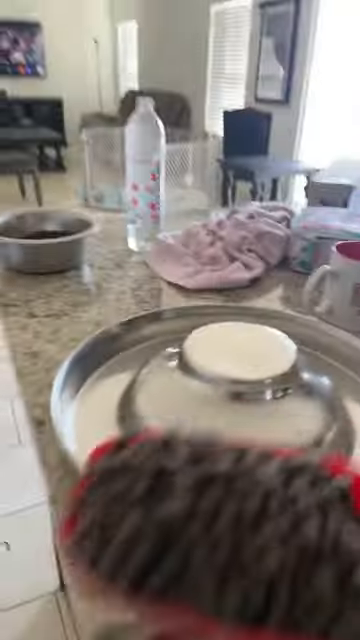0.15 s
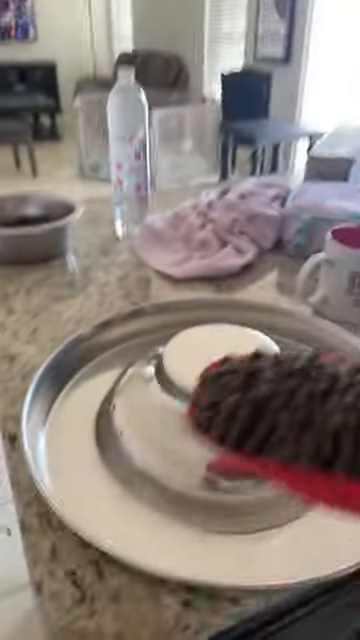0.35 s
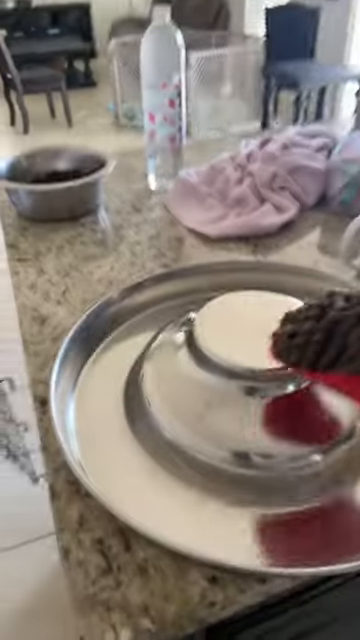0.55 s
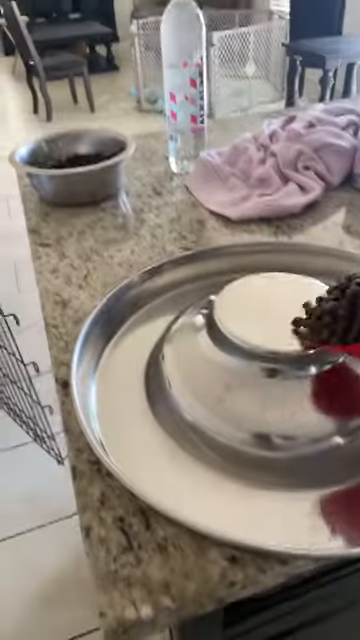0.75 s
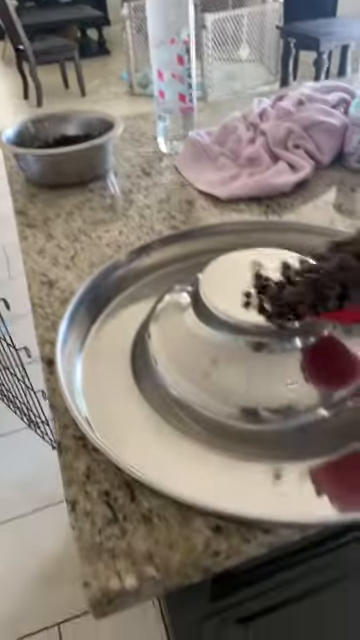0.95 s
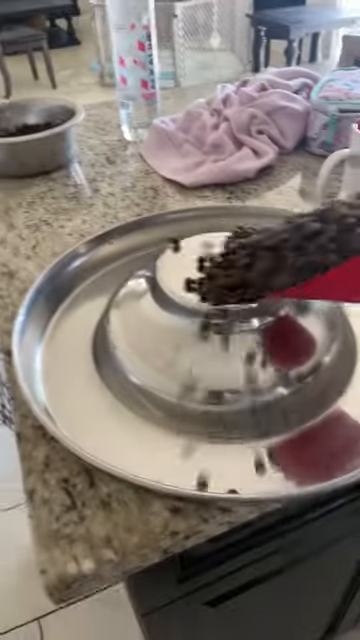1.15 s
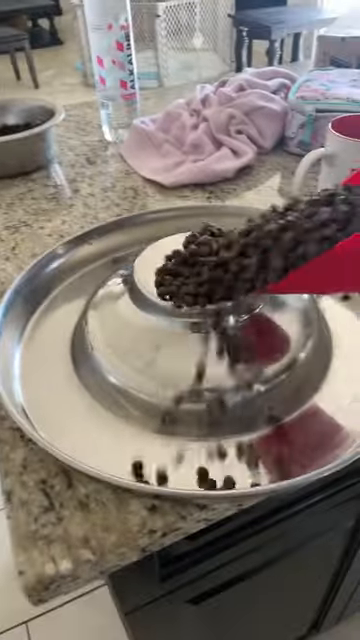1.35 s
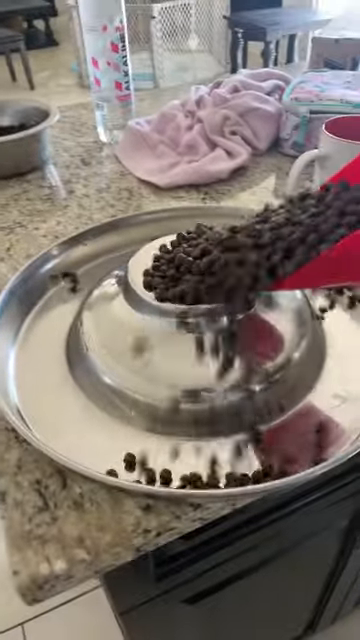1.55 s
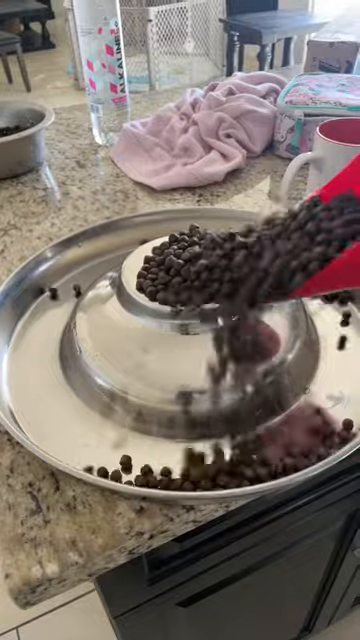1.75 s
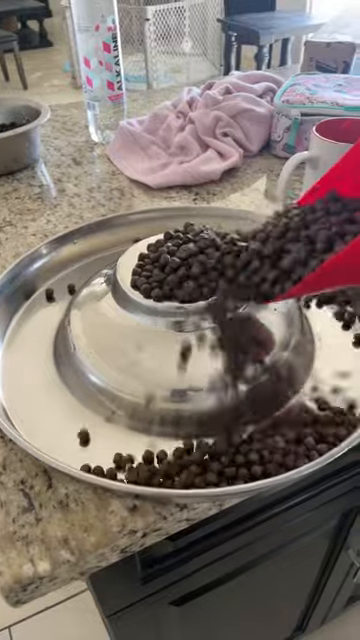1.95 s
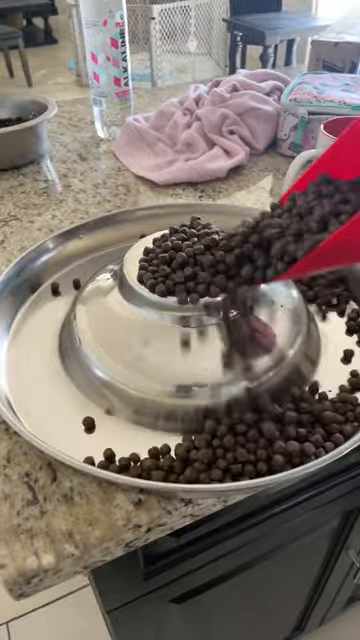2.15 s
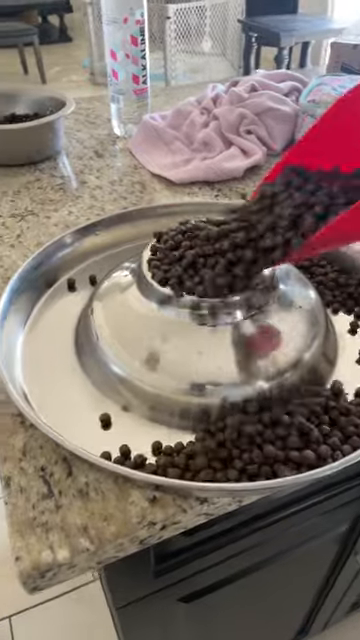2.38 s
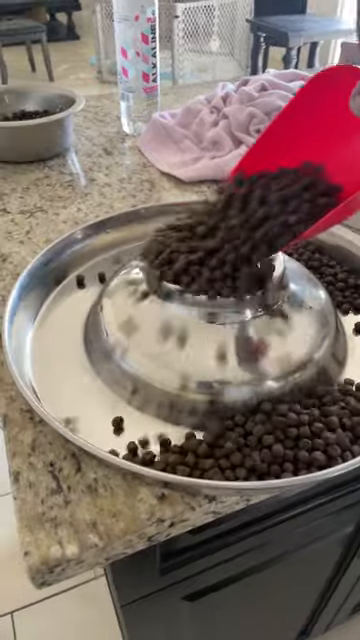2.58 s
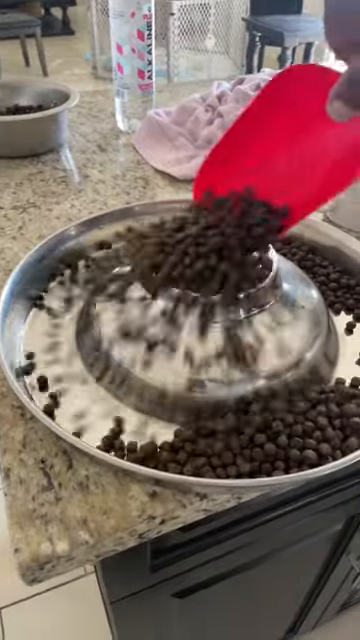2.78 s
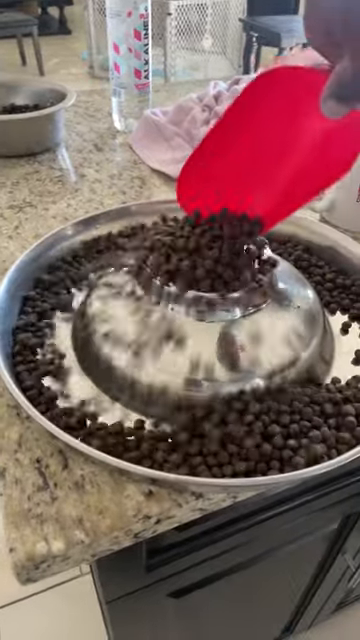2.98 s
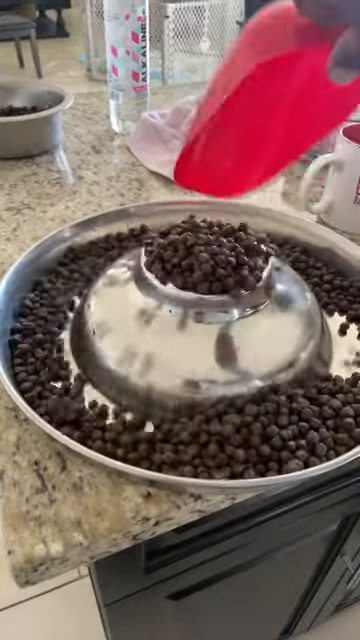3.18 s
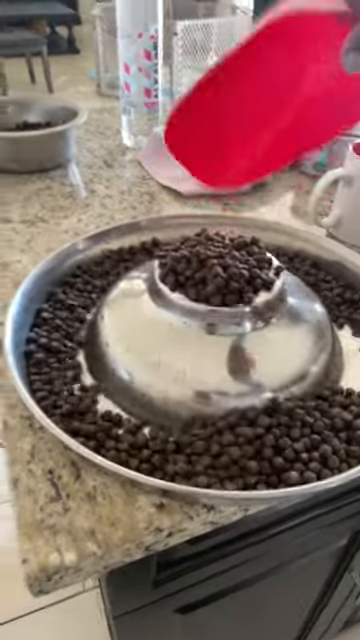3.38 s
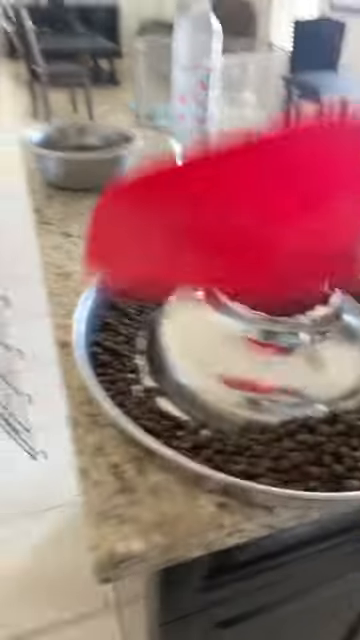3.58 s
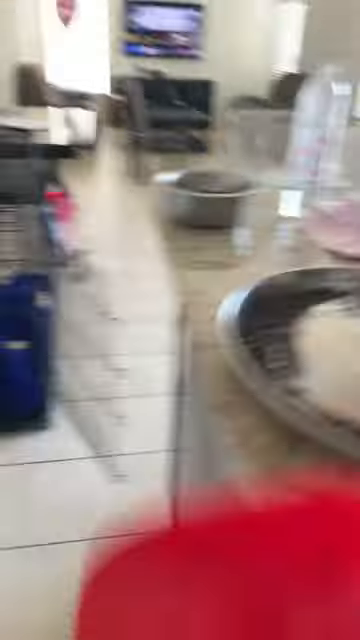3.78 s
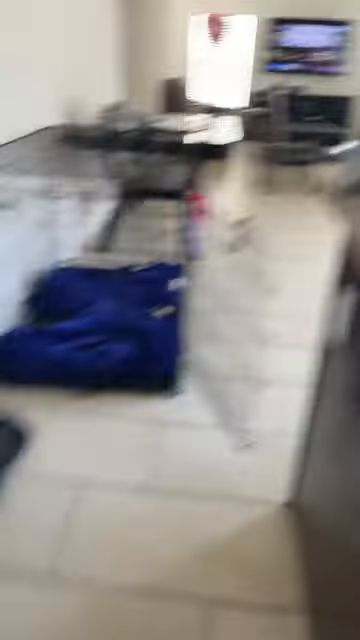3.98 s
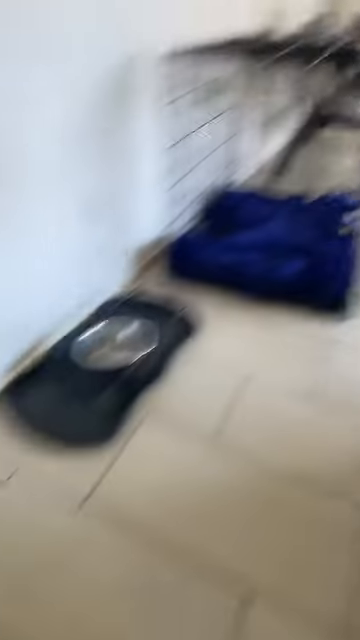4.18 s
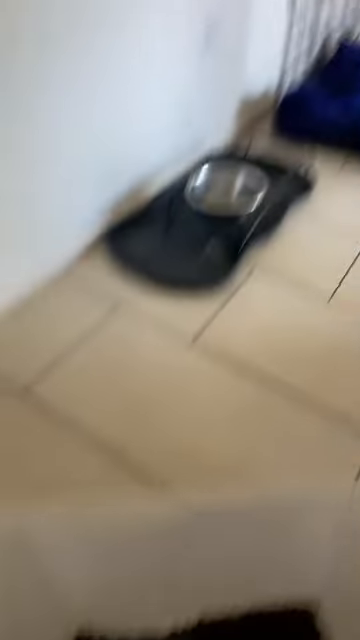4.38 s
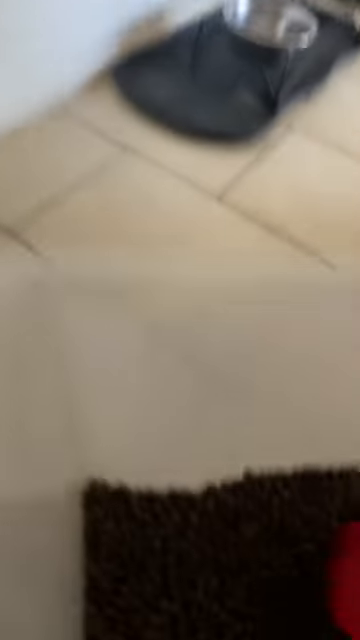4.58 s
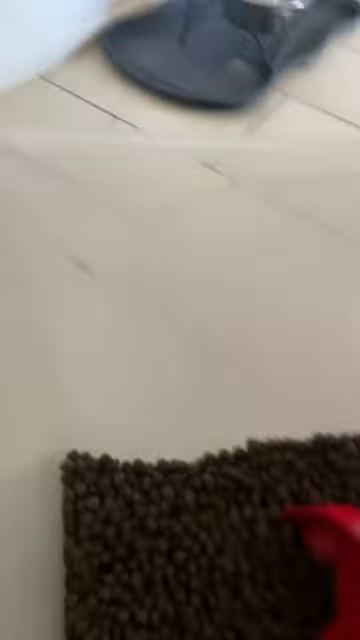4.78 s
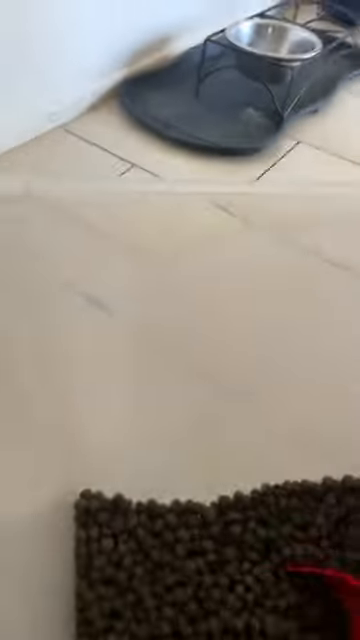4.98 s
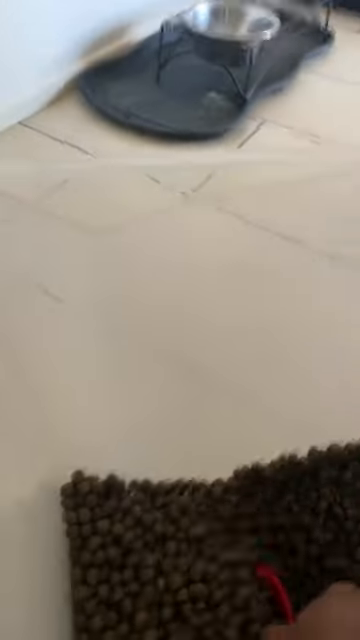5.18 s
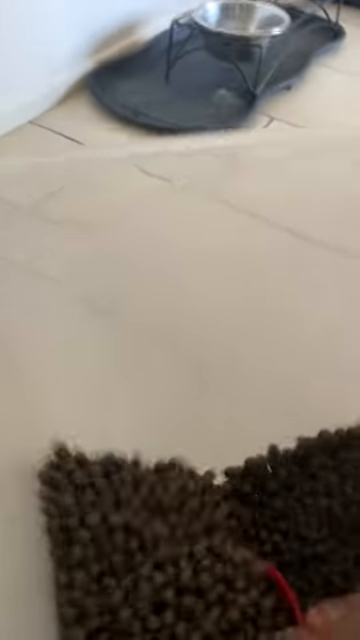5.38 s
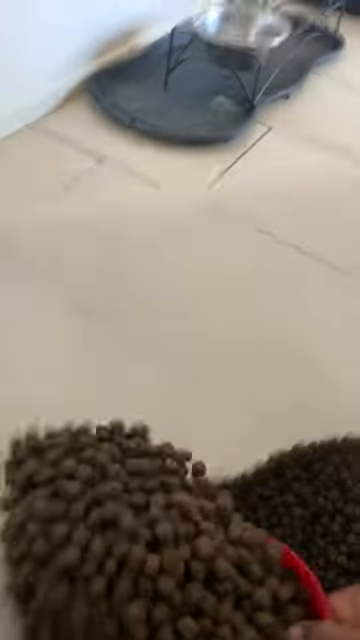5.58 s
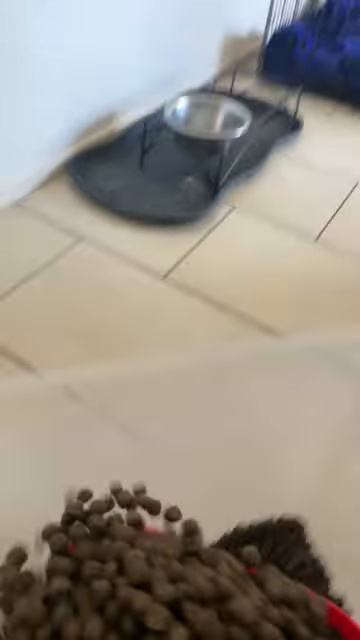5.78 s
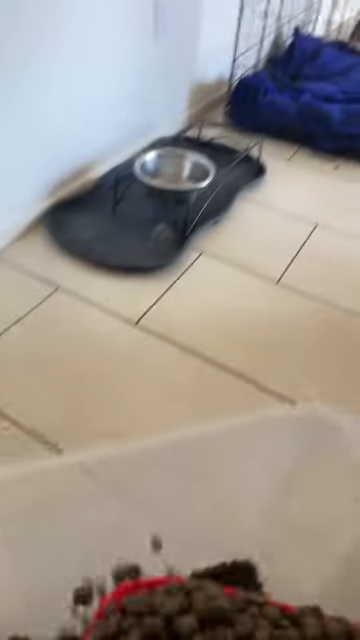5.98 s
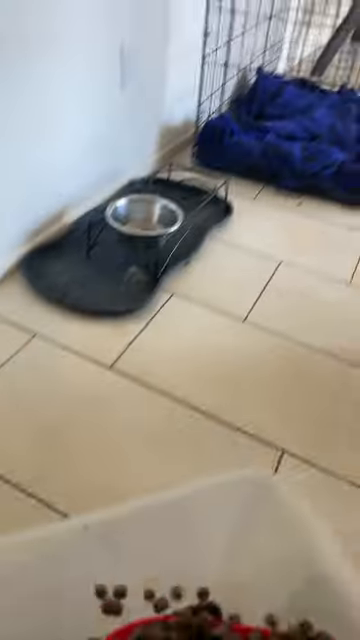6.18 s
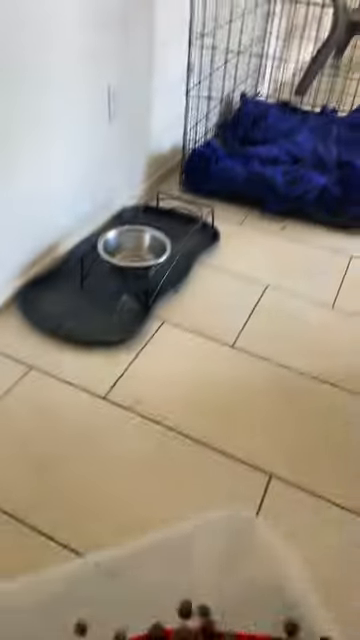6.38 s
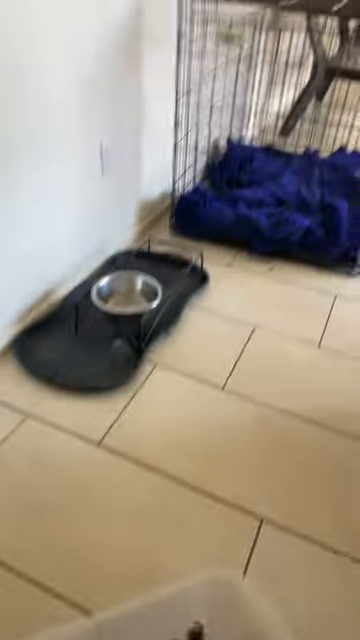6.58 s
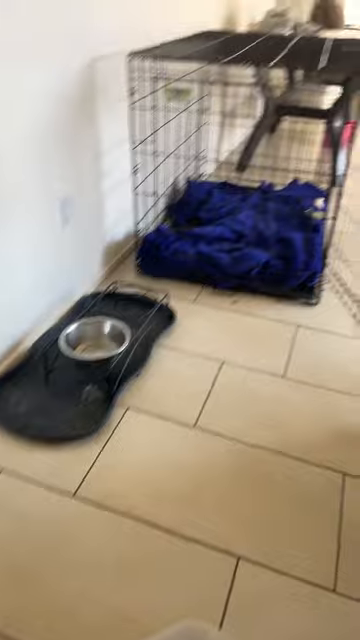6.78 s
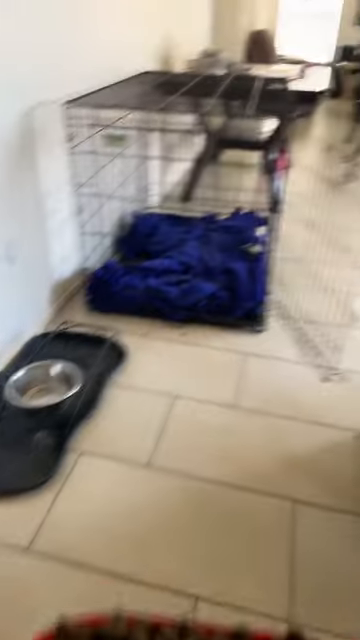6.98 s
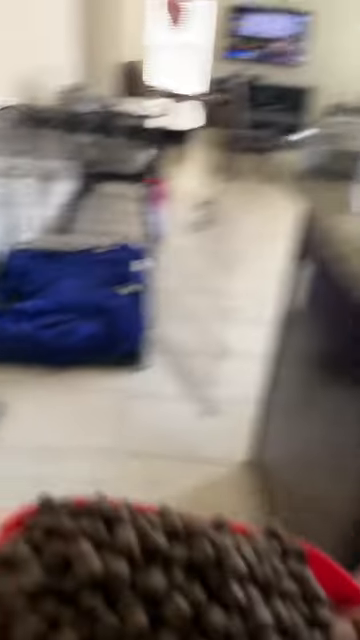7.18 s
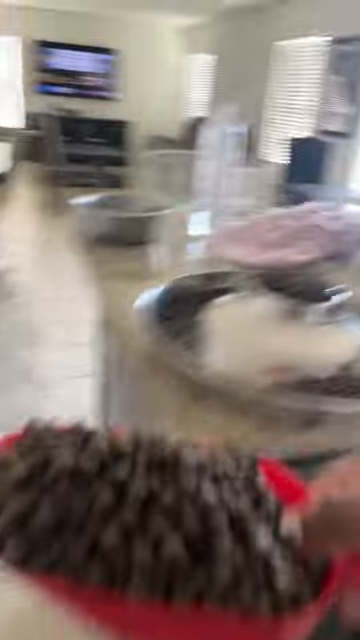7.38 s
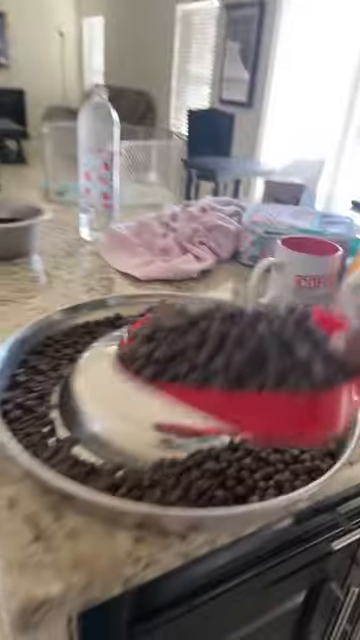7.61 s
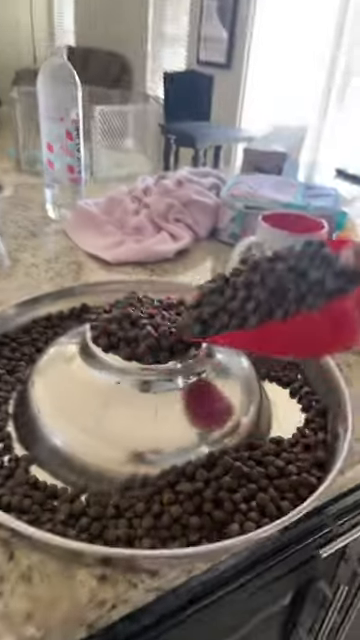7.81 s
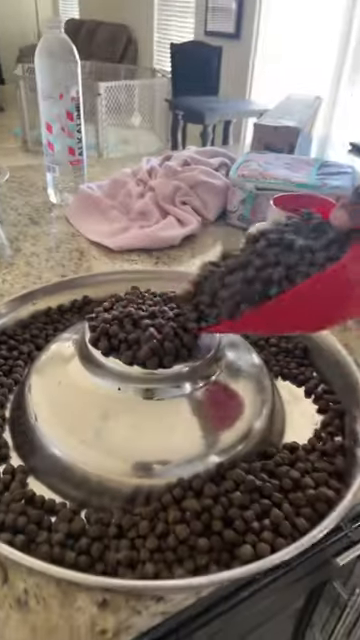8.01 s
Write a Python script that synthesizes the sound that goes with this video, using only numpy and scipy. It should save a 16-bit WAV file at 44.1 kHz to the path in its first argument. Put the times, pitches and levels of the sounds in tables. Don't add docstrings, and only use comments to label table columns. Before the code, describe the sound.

Hard pellets ping and rattle onto metal, a pause, gritty digging in a kibble tub with stray pellets dropping, then a fresh patter on steel.

```python
import sys
import numpy as np
from scipy import signal
from scipy.io import wavfile
from scipy.ndimage import uniform_filter1d

SR = 44100
rng = np.random.default_rng(int(sys.argv[2]) if len(sys.argv) > 2 else 0)


def level_to_linear(level):
    exponent = np.asarray(level, float) / 20
    return 10 ** exponent


def to_wav(s):
    ch = np.atleast_2d(s).T
    pcm = np.round(np.clip(ch, -1, 1) * 32767)
    wavfile.write(sys.argv[1], SR, pcm.astype(np.int16))


N = 355005
T = np.arange(N) / SR


def evened(x):
    return x / np.sqrt(np.mean(x ** 2) + 1e-20)


def read(points, hz):
    f, value = np.transpose(points)
    return np.interp(np.log(hz + 1), np.log(f + 1), value)


def curve(points):
    return np.interp(T, *np.transpose(points))


def controls(spans):
    s, db = np.concatenate(spans).T
    heard = np.any([(T >= a[0][0]) & (T <= a[-1][0]) for a in spans], axis=0)
    for a, b in zip(spans, spans[1:]):
        end_s, next_s = a[-1][0], b[0][0]
        if next_s - end_s < 0.5:
            heard |= (T > end_s) & (T < next_s)
    return np.where(heard, np.interp(T, s, db), -200)


def coloured(x, points):
    db = read(points, abs(np.fft.fftfreq(4096, 1 / SR)))
    log_gain = np.log(level_to_linear(np.maximum(db, -90)))
    taps = np.fft.ifft(np.exp(np.conj(signal.hilbert(log_gain)))).real[:2048]
    return signal.oaconvolve(x, taps)[:len(x)]


def resonate(x, hz, width):
    return signal.lfilter(*signal.iirpeak(hz, hz / max(width, 1), SR), x)


def highpass(x, order, hz):
    return signal.sosfilt(signal.butter(order, hz, "high", fs=SR, output="sos"), x)


def band(x, lo_hz, hi_hz):
    return evened(signal.sosfilt(signal.butter(3, [lo_hz, hi_hz], "band", fs=SR, output="sos"), x))


def hail(per_s, spread_db):
    struck = rng.random(N) < per_s / SR
    size = np.minimum(rng.exponential(1, N), 4.5)
    return evened(struck * rng.choice([-1., 1.], N) * level_to_linear(spread_db * size))


def levelled(clicks, seconds_inverse):
    return clicks / np.sqrt(uniform_filter1d(clicks ** 2, SR // seconds_inverse) + .05)


def bursts(rows, rise_s):
    out = np.zeros(N)
    for s, peak_db, fade_s in rows:
        at = round(s * SR)
        t = T[:min(round(.12 * SR), N - at)]
        out[at:at + len(t)] += level_to_linear(peak_db) * (1 - np.exp(-t / rise_s)) * np.exp(-t / max(fade_s, .002))
    return out


def ringer(hz, width, seconds):
    t = T[:SR // (10 if seconds < .13 else 5)]
    cycles = np.outer(hz, t) + rng.random((len(hz), 1))
    modes = np.exp(-np.pi * np.outer(width, t)) * np.sin(2 * np.pi * cycles)
    modes *= np.minimum(t / 0.00025, 1)

    def strike(db, spread_db):
        size = level_to_linear(db + spread_db * rng.standard_normal(len(hz))) * rng.choice([-1., 1.], len(hz))
        ring = size * np.sqrt(width) @ modes
        return ring / np.linalg.norm(ring)
    return strike


# time_s, flow_db
POURS = [
    [(0.76, -29), (0.89, -22), (0.93, -16.5), (1.02, -23.5), (1.05, -15.5), (1.12, -16), (1.15, -20.5),
     (1.16, -18)],
    [(1.25, -15), (1.85, -17), (2.32, -30), (2.55, -23), (2.92, -14.5), (3.28, -29), (3.45, -33.5),
     (3.72, -54), (3.92, -66)],
    [(7.975, -31), (7.991, -29.5), (8.05, -27)],
]
# time_s, peak_db
PINGS = [(0.7593, -9), (0.7996, -12), (0.8228, -9.5), (0.882, -1), (0.9298, 7.5), (0.9899, -2),
         (1.0439, 3.5), (1.095, -9), (1.1122, -13), (1.1655, -8), (1.173, -3), (1.2084, -3.5),
         (2.0638, -22.5), (2.1505, -5), (2.2904, -13), (2.3797, -21.5), (2.4634, -7), (2.6528, -10.5),
         (3.3338, -10), (3.3448, -10.5), (3.3868, -12), (3.441, -14.5), (3.4595, -10.5), (3.484, -21),
         (3.544, -29.5), (3.557, -25), (3.6017, -33), (3.7301, -42.5), (7.9775, -15), (7.9935, -11.5),
         (8.0174, -16), (8.0314, -24.5)]
# time_s, peak_db, fade_s
CLUMPS = [(1.0449, -1, 0.014), (1.0923, -7.5, 0.014), (1.1127, -6, 0.014), (1.1661, 1, 0.014),
          (1.2095, -1, 0.014), (1.2689, -2, 0.014), (1.2898, -1.5, 0.014), (1.3342, -4, 0.014),
          (1.3771, -1.5, 0.014), (1.4275, -6.5, 0.014), (1.4689, -5.5, 0.014), (1.5527, -6, 0.014),
          (1.5986, -9, 0.014), (1.6211, -6, 0.014), (1.6989, -7, 0.014), (1.7707, -9.5, 0.014),
          (1.8321, -8.5, 0.014), (1.9638, -10, 0.014), (2.0216, -11.5, 0.014), (2.065, -12, 0.014),
          (2.1509, -13, 0.014), (2.1923, -13, 0.014), (2.2127, -18, 0.014), (2.2776, -15, 0.014),
          (2.29, -14, 0.014), (2.327, -13, 0.014), (2.3803, -19, 0.014), (2.4167, -18, 0.014),
          (2.4357, -17, 0.014), (2.4636, -9.5, 0.014), (2.5494, -12.5, 0.014), (2.5819, -13, 0.014),
          (2.5958, -11.5, 0.014), (2.6357, -12, 0.014), (2.6532, -6, 0.014), (2.7325, -6.5, 0.014),
          (2.7969, -6, 0.014), (2.8173, -3.5, 0.014), (2.8483, -8.5, 0.014), (2.8637, -4.5, 0.014),
          (2.9146, -7.5, 0.014), (2.9416, -6.5, 0.014), (2.9954, -6, 0.014), (3.0493, -9, 0.014),
          (3.1241, -9.5, 0.014), (3.1725, -17, 0.014), (3.2199, -16.5, 0.014), (3.2628, -18, 0.014)]
FULL_FLOW_DB = -16.5
EMPTIED_S = (3.28, 3.36)


def pellet_stream(flow_db, buried, emptied_db):
    per_s = np.clip(1300 * level_to_linear(0.54 * (flow_db - FULL_FLOW_DB)), 150, 1800)
    handfuls = bursts(CLUMPS, rise_s=0.004) * level_to_linear(-5.5 - np.maximum(flow_db, -40))
    pellets = levelled(hail(per_s * (1 + 1.2 * handfuls ** 2), spread_db=3.0), 25)
    between = level_to_linear(-3.5 * buried * (T < EMPTIED_S[0]))
    clumps_db = 0.5 * band(rng.standard_normal(N), 5.35, 30)
    clumps_db += 20 * np.log10(np.hypot(between, handfuls))
    stream = level_to_linear(flow_db - 0.54 + 2.8 * buried - emptied_db + clumps_db) * pellets
    s, peak_db = np.transpose(PINGS)
    at = np.round(s * SR).astype(int)
    stream[at] = level_to_linear(peak_db + 14 + 0.13 * emptied_db[at])
    return stream, clumps_db


# time_s, share
AIM = [
    (1.9, 0.28),
    (2.35, 1.6),
    (3.1, 1.3),
    (3.4, 0.15),
    (7.98, 0.15),
    (7.995, 2.4),
]
# pitch_hz, level_db
PAN = [(1486, -53), (1970, -36), (2245, -41), (2406, -39), (2697, -50), (2929, -38), (3262, -41),
       (3747, -42), (4118, -38), (4441, -34), (4597, -34), (4759, -38), (5157, -46), (5346, -44),
       (5965, -39), (6390, -46), (6616, -46), (6885, -50), (7052, -47), (7241, -46), (7569, -49),
       (7827, -48), (8339, -52), (8834, -51), (9275, -53), (9518, -57), (9803, -53), (10196, -57),
       (10820, -60), (11305, -61)]
# pitch_hz, width_hz, level_db
DOME = [(616.4, 14, -21), (1019, 11, -5), (1178, 6.1, -11), (1484, 18, -12), (1717, 13, 1), (2440, 19, -19),
        (3060, 14, -10), (3455, 7.8, 0.5), (4310, 17, -9), (4100, 16, -6.5), (4550, 12, -9),
        (5214, 24, -18), (5360, 20, -11), (6030, 22, -7)]
# pitch_hz, width_hz, level_db
TRAY = [(935, 60, -10.5), (1032, 27, -2.5), (1086.5, 21, 3), (1126.7, 22, 3), (1181, 18, -6),
        (1210, 47, -10.5)]
# pitch_hz, width_hz, level_db
LIP = [(4118, 20, -5), (4442, 18, 0), (4510, 18, -4), (4598, 14, 0), (4760, 20, -4), (5950, 25, -5),
       (6014, 22, -5)]
# pitch_hz, level_db_per_hz
STEEL = [(240, -55), (400, -33), (921, -20.5), (1110, -10.5), (1730, -11.5), (1930, -6.5), (3580, -2),
         (4580, -2), (5030, -6.5), (6050, -2), (13500, -27), (16000, -37.5)]
# pitch_hz, width_hz, level_db
BUNCHES = [(2260, 140, 5.5), (3090, 260, 5.5), (3930, 190, 4.5), (4550, 200, 4), (6020, 180, 3.5)]


def pan_ring(stream, flow_db, buried, emptied_db):
    spots, small = 5, 240
    aimed = curve(AIM)
    tray_db = np.interp(T, (0.79, 1.95), [-14.5, -13.5])
    tray_db += 0.5 * aimed * np.clip(flow_db - FULL_FLOW_DB, -16, 0)
    lip_db = 0.3 * np.clip(FULL_FLOW_DB - flow_db, 0, 12) - 10 - emptied_db * (T < 7)
    wall_db = -26 + 9 * aimed

    hz = 1250 + 14500 * ((np.arange(small) + rng.random(small)) / small) ** 1.5
    crowd_db = read(STEEL, hz) + 5 * np.log10(hz)
    crowd_db += sum(db * np.exp(-((hz - f) / w) ** 2) for f, w, db in BUNCHES)
    pan_hz, pan_db = np.transpose(PAN)
    tray, dome, lip = np.transpose(TRAY), np.transpose(DOME), np.transpose(LIP)
    strike_crowd = ringer(hz, 26 + 0.0027 * hz, .1)
    strike_rim = ringer(pan_hz, 9 + 0.0017 * pan_hz, .2)
    strike_tray = ringer(*tray[:2], .1)
    strike_dome = ringer(*dome[:2], .2)
    strike_lip = ringer(*lip[:2], .2)
    strike_wall = ringer(np.array([1969.]), np.array([11.]), .25)

    dwell = np.repeat(rng.integers(0, spots, N // 2000 + 1), 2000)[:N]
    spot = np.where(rng.random(N) < .6, dwell, rng.integers(0, spots, N))
    out = np.zeros(N)
    for k in range(spots):
        hits = stream * (spot == k)
        covered = hits * buried
        struck = [
            (hits * level_to_linear(-7.75 + 3.95 * buried), strike_crowd(crowd_db, 3.4)),
            (covered * level_to_linear(-6.0), strike_rim(pan_db, 5)),
            (covered * level_to_linear(lip_db), strike_lip(lip[2], 4.0)),
            (covered * level_to_linear(wall_db), level_to_linear(4 * rng.standard_normal()) * strike_wall(0, 0)),
            (covered * level_to_linear(tray_db), strike_tray(tray[2], 4)),
            (hits * (1 - buried) * level_to_linear(0.5), strike_dome(dome[2], 2.5)),
        ]
        out += sum(signal.oaconvolve(blows, ring)[:N] for blows, ring in struck)
    return highpass(out, 4, 560)


# pitch_hz, width_hz, level_db
BOOM = [(211.5, 27, -8), (225, 86, 6)]


def dry_patter(stream, clumps_db, flow_db, buried, emptied_db):
    clicks = hail(per_s=1800, spread_db=3.0)
    out = level_to_linear(flow_db - 23.5 - emptied_db + 1.4 * clumps_db) * band(clicks, 5600, 21000)
    out += level_to_linear(-42) * band(stream, 2500, 13500)
    out += level_to_linear(flow_db - 31) * band(hail(per_s=3000, spread_db=2.5), 400, 900)
    drum = sum(level_to_linear(db) * resonate(clicks, f, w) for f, w, db in BOOM)
    return out + level_to_linear(0.62 * flow_db - 34.5 + 9.9 * (1 - buried)) * band(drum, 110, 320)


def pour():
    flow_db = controls(POURS)
    buried = np.interp(T, (0.84, 1.03), [0, 1])
    emptied_db = np.interp(T, EMPTIED_S, [0, 8.5])
    stream, clumps_db = pellet_stream(flow_db, buried, emptied_db)
    ring = pan_ring(stream, flow_db, buried, emptied_db)
    return ring + dry_patter(stream, clumps_db, flow_db, buried, emptied_db)


def follower(effort_db, shear, base_db, push_db, share, lag_s):
    keep = np.exp(-1 / (lag_s * SR))
    effort = level_to_linear(effort_db + 24)
    late = signal.lfilter([1 - keep], [1, -keep], effort)
    late = np.maximum(late, 0.3 * effort)
    return level_to_linear(base_db + push_db * shear) * late ** share


# time_s, crunch_db
DIG = [
    [(4.583, -28), (4.593, -28), (4.64, -21), (4.84, -27), (4.99, -43.5), (5.04, -26.5), (5.1, -21.5),
     (5.21, -24.5), (5.26, -42)],
    [(5.27, -39.5), (5.39, -29), (5.57, -29), (5.83, -25.5), (6.21, -40), (6.34, -39.5), (6.83, -49),
     (7.0, -64)],
    [(7.87, -39.5), (7.968, -46), (7.975, -46)],
]
# time_s, grains_per_s
GRAINS_PER_S = [
    (4.6, 5150),
    (5.9, 4040),
    (6.2, 930),
    (6.9, 670),
    (7.9, 1300),
]
# time_s, share
SHEAR = [
    (4.75, 1.36),
    (5.2, 0.61),
    (5.34, .25),
]
# time_s, peak_db, fade_s
SURGES = [(4.5914, -11, 0.007), (4.6108, -16, 0.007), (4.6353, -17.5, 0.007), (4.6527, -10, 0.007),
          (4.6777, -7.5, 0.007), (4.759, -8, 0.007), (4.7889, -9.5, 0.007), (4.8228, -15.5, 0.007),
          (4.8468, -10.5, 0.007), (4.8912, -17, 0.007), (4.9286, -20.5, 0.007), (4.9969, -29, 0.007),
          (5.0338, -20.5, 0.007), (5.0478, -15, 0.007), (5.0892, -12.5, 0.007), (5.1027, -14, 0.007),
          (5.1426, -12, 0.007), (5.1601, -10.5, 0.007), (5.189, -12.5, 0.007), (5.1895, -6, 0.007),
          (5.2089, -8, 0.007), (5.2798, -25, 0.007), (5.3157, -27, 0.007), (5.3481, -25.5, 0.007),
          (5.3651, -26, 0.007), (5.3835, -21, 0.007), (5.3955, -18, 0.007), (5.4454, -9, 0.007),
          (5.5093, -23, 0.007), (5.5287, -21, 0.007), (5.5457, -18, 0.007), (5.5656, -18, 0.007),
          (5.5836, -16, 0.007), (5.6006, -14.5, 0.007), (5.6664, -22.5, 0.007), (5.6839, -20, 0.007),
          (5.7148, -15, 0.007), (5.7298, -14.5, 0.007), (5.7587, -13.5, 0.007), (5.7712, -16.5, 0.007),
          (5.8255, -18.5, 0.007), (5.8655, -17, 0.007), (5.8829, -15.5, 0.007), (5.9079, -19, 0.007),
          (5.9498, -23, 0.007)]
# pitch_hz, level_db_per_hz
PELLET = [(180, -31), (300, 11), (343, -4), (455, -19.5), (603, 9), (915, 4.5), (2000, 1.5), (3600, -4.5),
          (7200, -15.5), (13100, -51.5), (16000, -66)]
# pitch_hz, width_hz, level_db
KNOCK = [(400, 90, -3), (500, 106, 1), (559, 206, 8), (715, 160, 0), (882, 260, 1.5)]


def crunch():
    kinds = 16
    clicks = levelled(hail(curve(GRAINS_PER_S), spread_db=3.5), 30)
    kind, t, grains = rng.integers(0, kinds, N), T[:300], np.zeros(N)
    for k, puff in enumerate(rng.standard_normal((kinds, len(t)))):
        grain = evened(puff * np.exp(-t / 0.00093))
        grains += signal.oaconvolve(clicks * (kind == k), grain)[:N]

    shear = curve(SHEAR)
    level_db = controls(DIG) - 3.0 + 2.08 * shear
    jerks = bursts(SURGES, rise_s=0.0013) * level_to_linear(-7 - np.maximum(level_db, -50))
    jerks = np.hypot(level_to_linear(-1.5), jerks)
    grains, clicks = grains * jerks, clicks * jerks ** 0.8

    out = level_to_linear(level_db) * band(coloured(grains, PELLET), 1000, 6850)
    out += level_to_linear(level_db - 9.5) * shear * band(grains, 4190, 7800)
    fizz = follower(level_db, shear, base_db=-47, push_db=4.5, share=0.73, lag_s=1e-4)
    boom = follower(level_db, shear, base_db=-33.5, push_db=6.5, share=0.99, lag_s=0.28)
    knock = follower(level_db, shear, base_db=-33, push_db=6.5, share=1.0, lag_s=0.025)
    out += fizz * band(clicks, 6500, 13200)
    for gain, modes in ((boom, BOOM), (knock, KNOCK)):
        body = sum(level_to_linear(db) * resonate(resonate(grains, f, w), f, 3 * w) for f, w, db in modes)
        out += gain * evened(body)
    return out


def drop(s, peak_db, hz, knock_db):
    t = T[:1500]
    puff = rng.standard_normal(len(t))
    rattle = evened(resonate(puff, hz, 0.29 * hz)) + 0.43 * band(puff, 600, 5500)
    out = rattle * (np.exp(-t / 0.0035) + 0.18 * np.exp(-t / 0.012)) / 2.4
    out += level_to_linear(knock_db) * band(puff, 350, 1300) * np.exp(-t / 0.0051) / 0.64
    return round(s * SR), level_to_linear(peak_db) * out * np.minimum(t / .0003, 1)


def skip(s, peak_db):
    t, hz = T[:300], rng.uniform(4000, 9000)
    puff = rng.standard_normal(len(t))
    tick = band(puff, 3500, 15500) + 0.5 * evened(resonate(puff, hz, 0.4 * hz))
    tick *= np.exp(-t / 0.0009)
    return round(s * SR), level_to_linear(peak_db + 2.5) * tick / abs(tick).max()


def thud(s, peak_db, hz, t60):
    t = T[:round(t60 * SR)]
    return round(s * SR), level_to_linear(peak_db - 60 * t / t60) * np.sin(2 * np.pi * hz * t) * (1 - np.exp(-t / 0.0015))


# time_s, peak_db, pitch_hz
SLIPS = [(0.0752, -41, 2460), (0.652, -47.5, 1530), (0.7192, -46, 1720), (4.698, -9, 900),
         (4.737, -13, 800), (4.8546, -10.5, 900), (4.8914, -12, 1150), (4.9283, -14.5, 2440),
         (5.176, -7.5, 1000), (5.1884, -11.5, 2900), (5.219, -12, 2140), (5.2796, -22, 2190),
         (5.4454, -12, 1630), (5.5458, -22, 1430), (5.715, -21, 1690), (5.7592, -16, 1790),
         (7.8685, -29, 4200), (7.8903, -25.5, 2500), (7.9285, -26, 3400)]
# time_s, peak_db, pitch_hz
SPILLS = [(5.979, -16, 1800), (6.0278, -20.5, 1640), (6.0677, -18.5, 2240), (6.1131, -40, 1930),
          (6.134, -42, 3390), (6.1525, -26, 1790), (6.1811, -29, 3200), (6.2153, -30, 1610),
          (6.2525, -15.5, 1720), (6.2772, -25, 1590), (6.299, -20, 2200), (6.3372, -25.5, 2110),
          (6.3808, -22.5, 1620), (6.4076, -24.5, 1390), (6.4226, -23.5, 2700), (6.4678, -23, 2590),
          (6.5226, -49, 1280), (6.5404, -21, 1700), (6.576, -39, 1010), (6.599, -24, 2260),
          (6.6283, -33, 2610), (6.6389, -25, 1200), (6.718, -25, 2250), (6.7721, -32, 2900),
          (6.822, -33, 2710), (6.9, -31.5, 1240), (6.9407, -37.5, 1070)]
# time_s, peak_db
BOUNCES = [(5.9798, -25), (6.0029, -22), (6.02, -27), (6.0273, -30), (6.039, -24), (6.048, -28),
           (6.0575, -24), (6.0666, -24), (6.0803, -34), (6.0916, -22), (6.1021, -29), (6.1129, -28),
           (6.135, -24), (6.1489, -32), (6.16, -27), (6.1809, -35), (6.1916, -32), (6.2493, -24),
           (6.2545, -22), (6.278, -26), (6.2937, -35), (6.305, -28), (6.3134, -33), (6.336, -29),
           (6.3488, -33), (6.3658, -39), (6.3811, -27), (6.388, -20.5), (6.4002, -27), (6.4107, -36),
           (6.421, -23.5), (6.4328, -30), (6.4607, -28), (6.4677, -32), (6.5063, -29), (6.522, -39),
           (6.5369, -31), (6.5413, -33), (6.5542, -35), (6.5781, -32), (6.5988, -41), (6.6062, -37),
           (6.6208, -32), (6.6279, -25), (6.6548, -35), (6.6645, -32), (6.6903, -31.5), (6.7186, -33),
           (6.7231, -30), (6.7379, -35), (6.7643, -31), (6.7683, -36), (6.7728, -35), (6.7786, -38),
           (6.7844, -34), (6.802, -38), (6.822, -32), (6.8337, -36), (6.9008, -28), (6.9415, -29.5)]
# time_s, peak_db
SNAPS = [(4.8808, -34.5), (4.8923, -37), (4.9267, -31), (4.9556, -30), (5.219, -24.5), (5.2799, -37),
         (5.3057, -33), (5.3248, -32), (5.4445, -37), (5.7149, -31), (5.759, -34.5), (7.87, -34.5)]
# time_s, peak_db, pitch_hz, t60_s
THUDS = [
    (4.935, -17, 189, 0.066),
    (5.172, -12, 238, 0.12),
    (5.19, -3.5, 234.6, 0.11),
    (5.188, -11, 440, 0.08),
    (7.876, -40, 165, 0.2),
    (7.889, -26, 198, 0.12),
    (7.896, -31.5, 144, 0.18),
    (7.92, -36, 186, 0.18),
]


def spill_and_bump():
    sounds = [drop(*row, knock_db=-19.5) for row in SLIPS]
    sounds += [drop(s, db, hz, knock_db=-15 - 0.42 * (db + 20)) for s, db, hz in SPILLS]
    sounds += [skip(*row) for row in BOUNCES + SNAPS]
    sounds += [thud(*row) for row in THUDS]
    out = np.zeros(N)
    for at, sound in sounds:
        out[at:at + len(sound)] += sound[:N - at]
    return out


# pitch_hz, t60_s
ROOM = [(150, 0.14), (1000, 0.79), (4000, 0.35), (12000, 0.33)]


def room(x):
    taps = np.zeros(SR)
    at = np.arange(200, SR - 20, 20)
    taps[at + rng.integers(0, 20, len(at))] = rng.choice([-1., 1.], len(at))
    hz, t, z = signal.stft(taps, SR, nperseg=256)
    tail = signal.istft(z * level_to_linear(-60 * t / read(ROOM, hz)[:, None]), SR)[1]
    return signal.fftconvolve(x, tail / np.linalg.norm(tail))[:N]


# time_s, peak_db, rise_db_per_s, fall_db_per_s
WIND = [
    (4.05, -55.5, 231.5, 400),
    (4.235, -42, 600, 450),
    (4.375, -44, 400, 300.5),
    (4.46, -59.5, 200, 300),
    (4.74, -37.5, 102, 85.5),
    (4.95, -38.5, 321, 178.5),
    (5.21, -28, 200.5, 234.5),
    (5.4, -51.5, 48.5, 19),
    (7.03, -54, 900, 87.5),
]


def wind():
    gusts = sum(level_to_linear(db - np.where(T < s, rise * (s - T), fall * (T - s))) for s, db, rise, fall in WIND)
    return gusts * (T > 3.9) * band(rng.standard_normal(N), 46, 112)


# time_s, level_db
AIR = [(0.0, -48), (0.3, -70.5), (0.48, -66.5), (0.51, -59.5), (0.74, -64), (3.7, -60.5), (3.88, -64),
       (3.966, -70.5), (4.432, -85), (4.57, -73.5), (6.96, -52.5), (7.046, -56.5), (7.588, -74.5),
       (7.722, -58), (7.86, -58.5)]
# pitch_hz, level_db_per_hz
AIR_COLOUR = [(88, -31.5), (150, -4), (169, -18.5), (235, 1), (414, -9), (484, -6), (1120, -7), (2060, -9),
              (2650, -11.5), (13400, -32), (16000, -44)]


def gated_air():
    hz, t, z = signal.stft(rng.standard_normal(N), SR, nperseg=512)
    patches = uniform_filter1d(rng.standard_normal(z.shape), 5, axis=0)
    patches = evened(uniform_filter1d(patches, 14, axis=1))
    colour = level_to_linear(read(AIR_COLOUR, hz))
    colour *= np.sqrt(len(hz)) / np.linalg.norm(colour[(hz > 350) & (hz < 2500)])
    open_db = np.interp(t, *np.transpose(AIR))
    treble = np.clip(np.log2(hz / 1800 + 1e-9), 0, 1)[:, None]
    treble_db = 0.54 * treble * (-56.5 - open_db)
    return signal.istft(z * colour[:, None] * level_to_linear(open_db - 4.0 + treble_db + 3 * patches), SR)[1][:N]


# pitch_hz, width_hz, rms_db
HUM = [(70, 7.2, -65), (129, 4, -66), (225, 4.5, -67)]


def refrigerator():
    ducked = np.interp(T, (.8, 1.3), [0, 1]) - np.interp(T, (4.4, 8.3), [0, .7])
    return sum(level_to_linear(db - 10 * ducked) * evened(resonate(rng.standard_normal(N), f, width))
               for f, width, db in HUM)


# time_s, pitch_hz, width_hz, rms_db, length_s
FAINT_SOUNDS = [(.165, 1650, 130, -68, 0.24), (.325, 3020, 80, -73, 0.095), (.415, 1420, 90, -67, 0.12),
                (.415, 1700, 150, -67, .05), (0.494, 2054, 54, -57.5, 0.15), (.497, 2350, 237.6, -61, 0.12),
                (4.03, 1600, 120, -77, 0.47), (4.06, 3373, 140, -77, 0.12), (7.015, 603, 416.7, -54, 0.11),
                (4.495, 1500, 55.6, -69.5, 0.14), (4.52, 2150, 60, -80, .05), (7.02, 3050, 260, -69, 0.4),
                (7.101, 486, 120, -61, 0.26), (7.13, 1700, 99, -72.5, 0.1), (7.58, 2450, 149.6, -76.5, 0.071),
                (3.622, 1960, 28, -60, 0.098), (7.636, 5958, 1190, -71.5, 0.38), (7.2, 5892, 700.4, -83, 0.17)]


def faint_clinks_and_rustles():
    out = np.zeros(N)
    for s, f, width, db, length in FAINT_SOUNDS:
        t = T[:round(length * SR)]
        noise = rng.standard_normal(SR // 2)
        ring = evened(resonate(resonate(noise, f, width), f, width))[-len(t):]
        ring *= level_to_linear(db + 8.0 - 14 * t / length) * signal.windows.tukey(len(t), .3)
        out[round(s * SR):][:len(t)] += ring
    return out


def scene():
    close = pour() + crunch() + spill_and_bump()
    kitchen = gated_air() + refrigerator() + faint_clinks_and_rustles()
    return (close + room(level_to_linear(-17.0) * close) + wind() + kitchen)[None]


def low_pass(x):
    return signal.sosfilt(signal.butter(12, 16470, fs=SR, output="sos"), x)


def record(dry):
    thin = highpass(dry, 3, 45)
    limited = 1.156 * np.tanh(thin / 1.254)
    edge = signal.firwin(255, 15900, window=("kaiser", 8), fs=SR)[None]
    mix = signal.oaconvolve(limited, edge, "same")
    return low_pass(mix)


dry = scene()
out = record(dry)
to_wav(out)
```